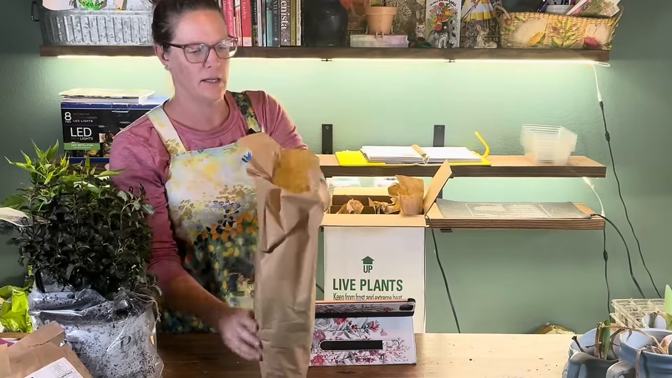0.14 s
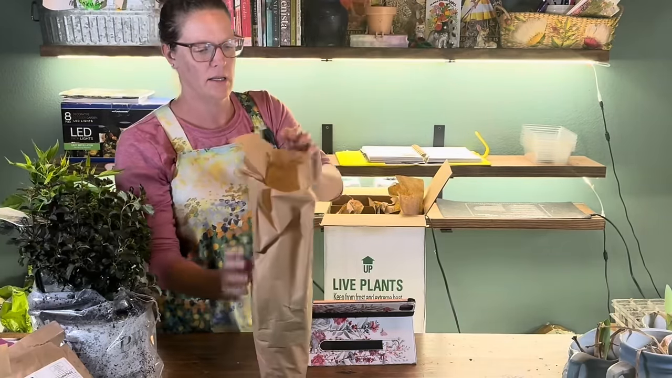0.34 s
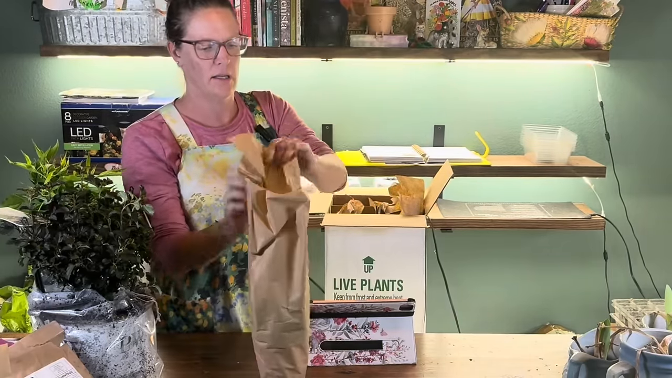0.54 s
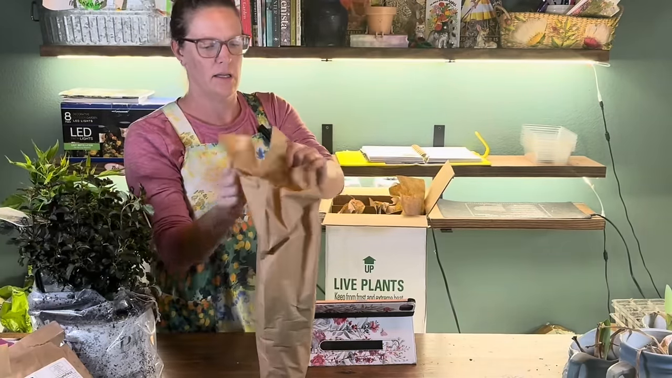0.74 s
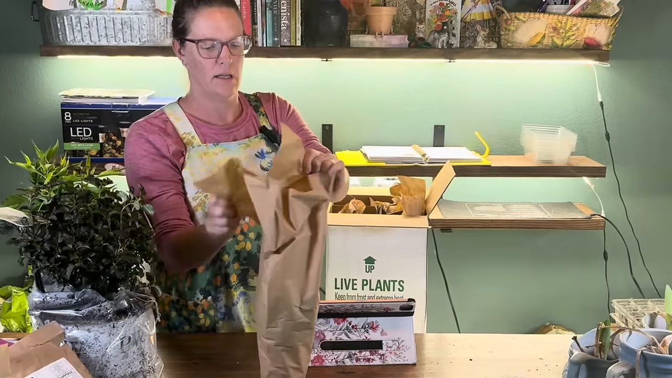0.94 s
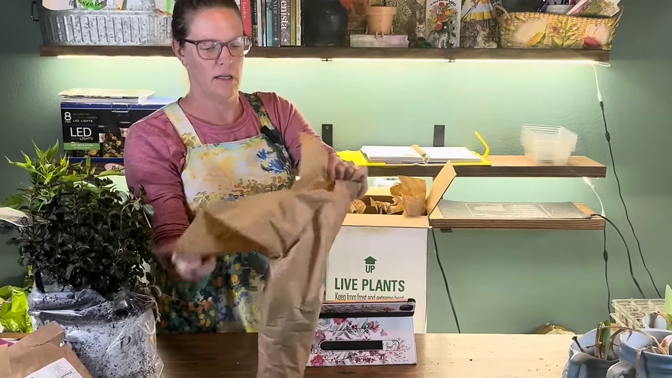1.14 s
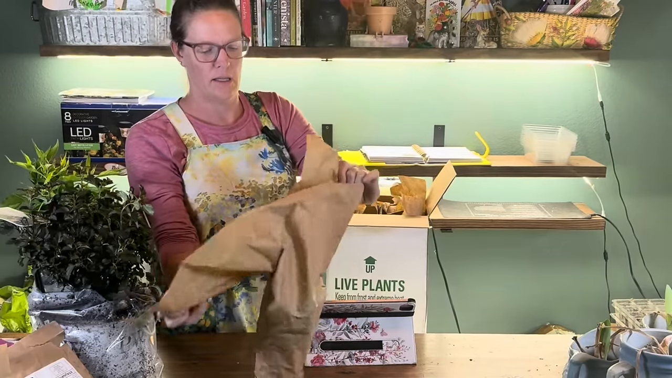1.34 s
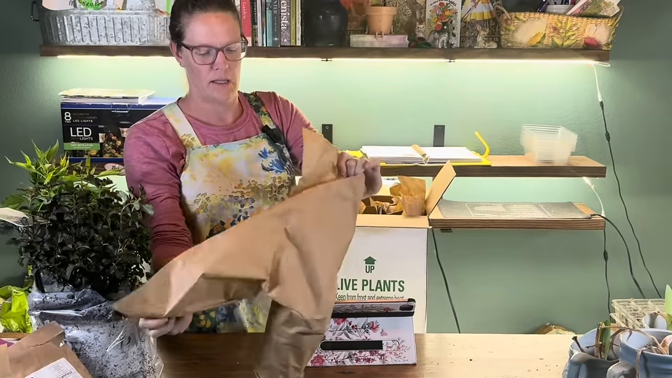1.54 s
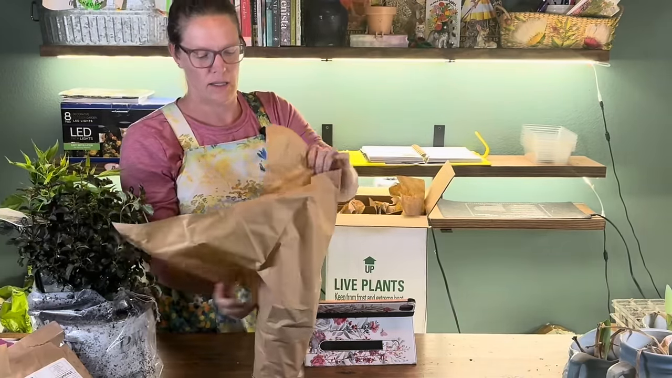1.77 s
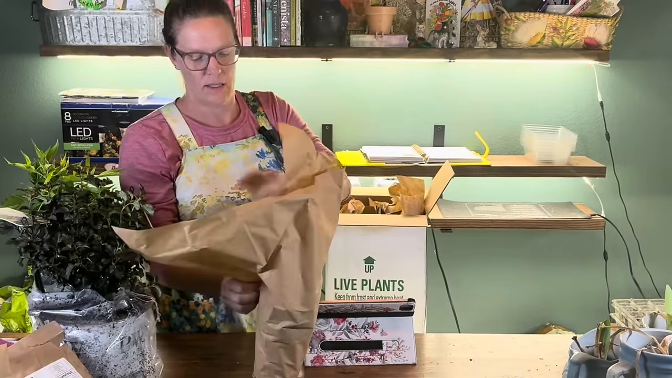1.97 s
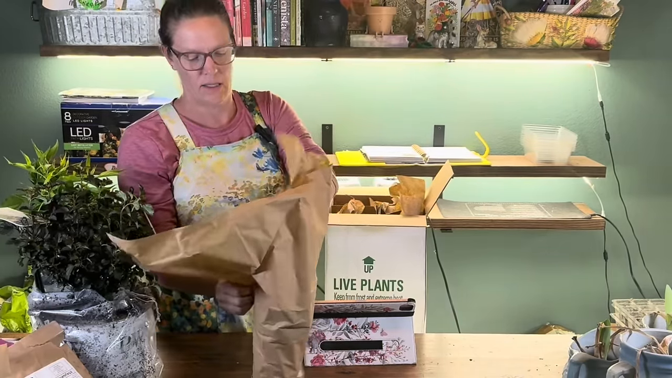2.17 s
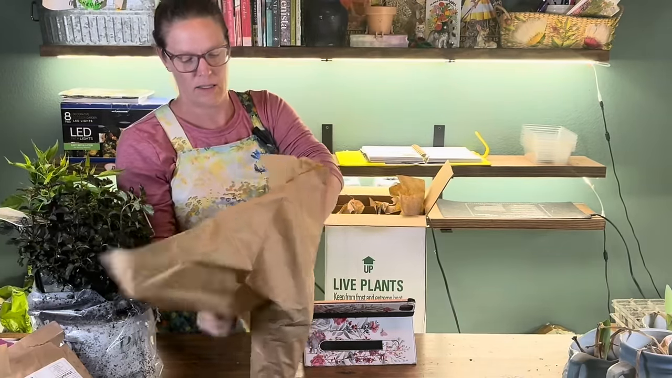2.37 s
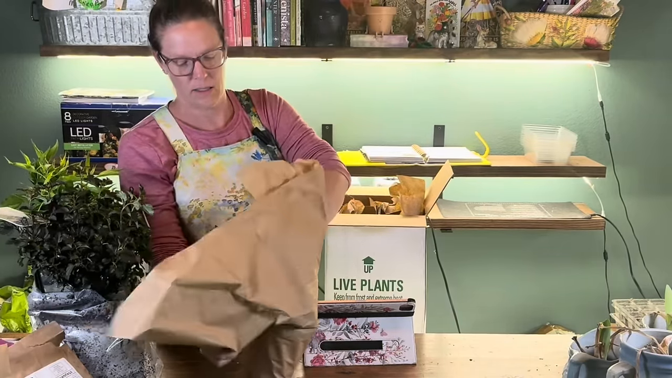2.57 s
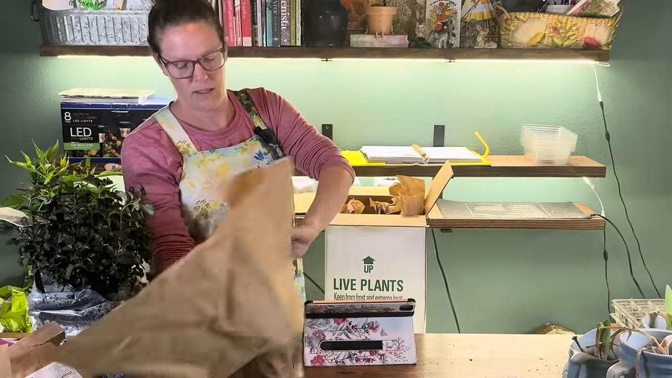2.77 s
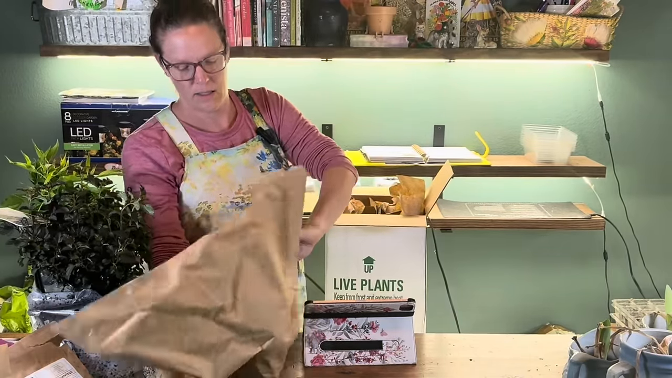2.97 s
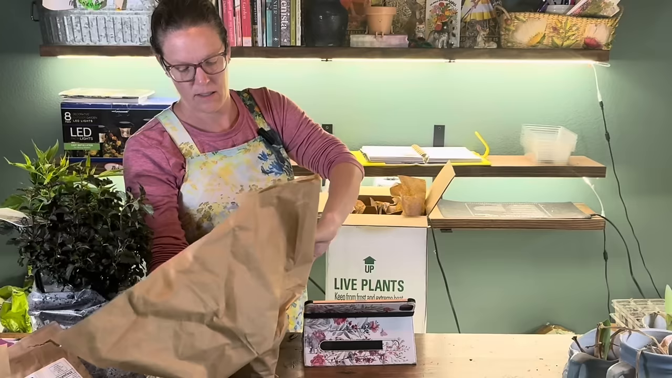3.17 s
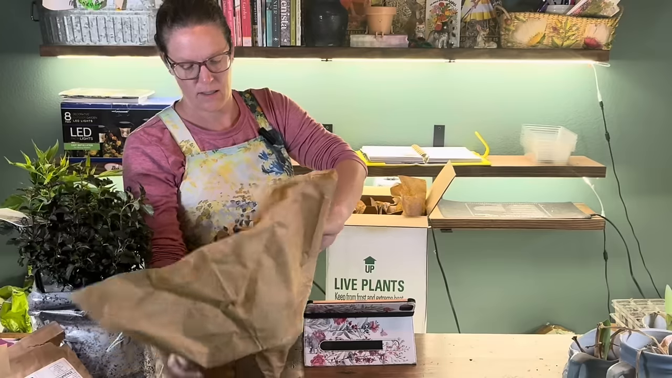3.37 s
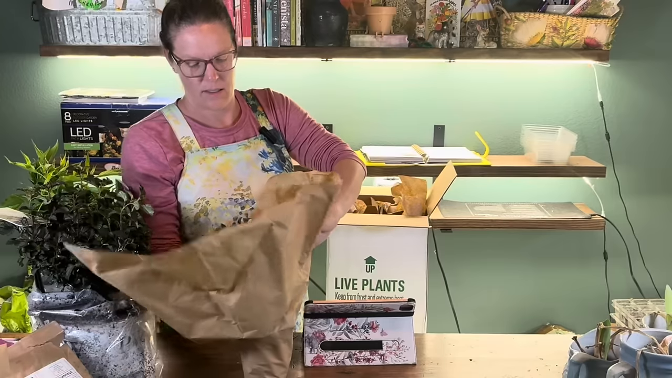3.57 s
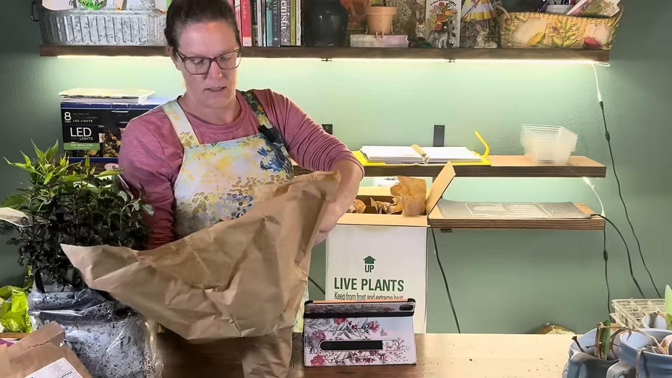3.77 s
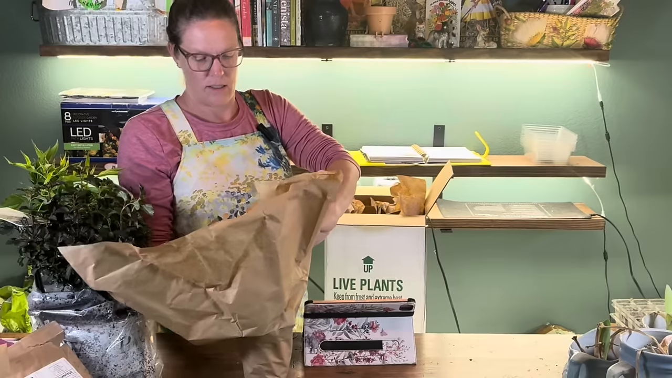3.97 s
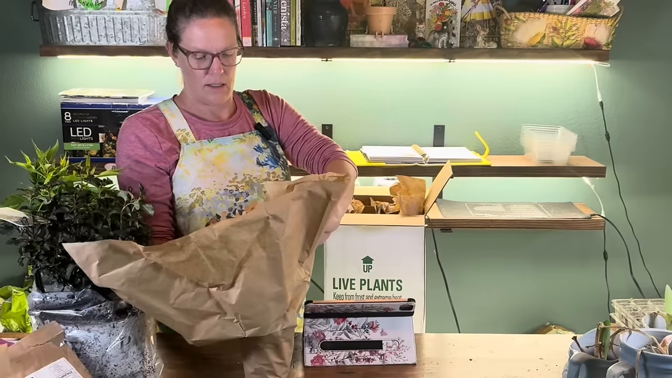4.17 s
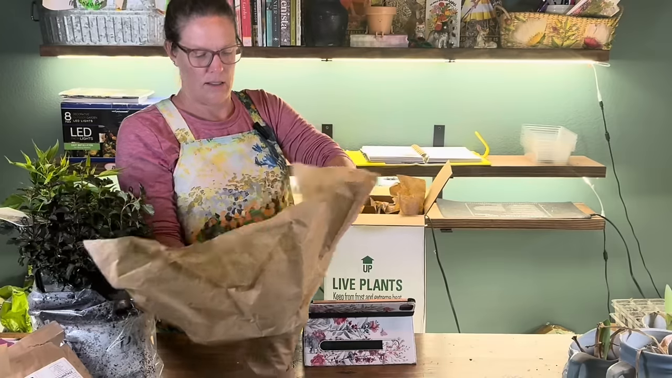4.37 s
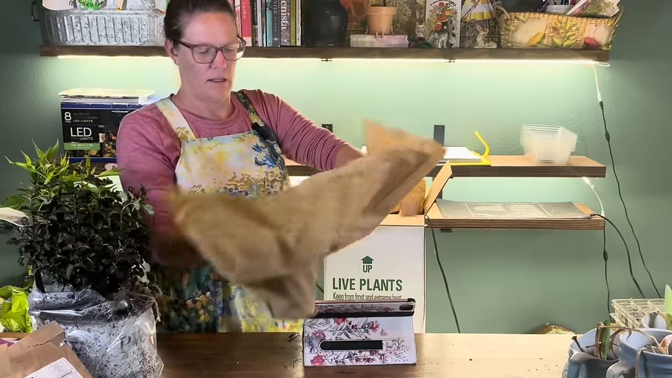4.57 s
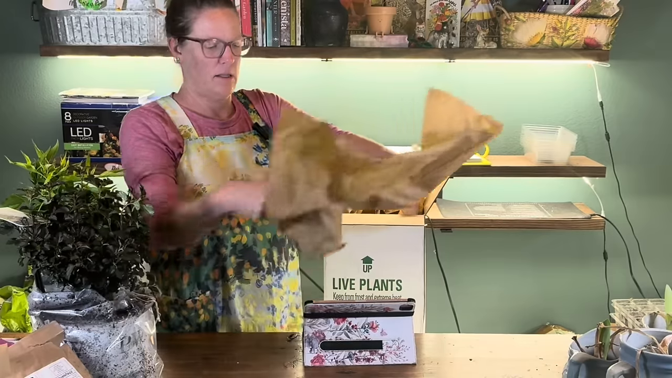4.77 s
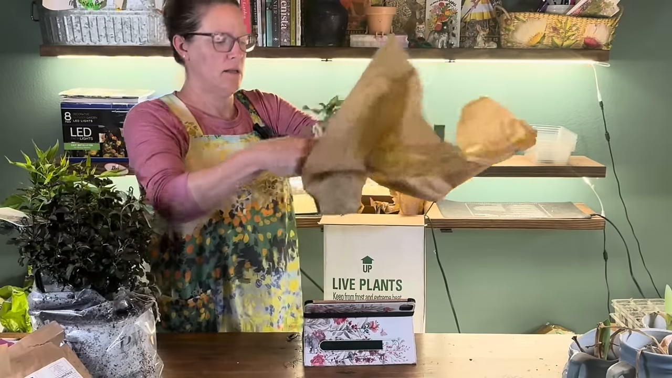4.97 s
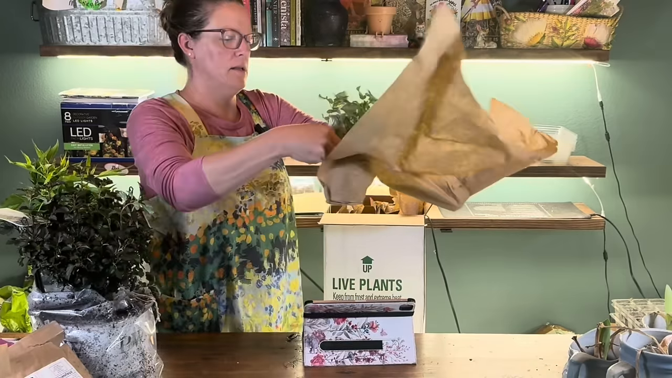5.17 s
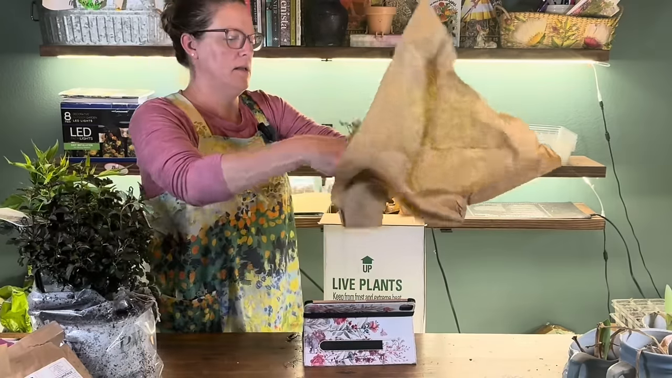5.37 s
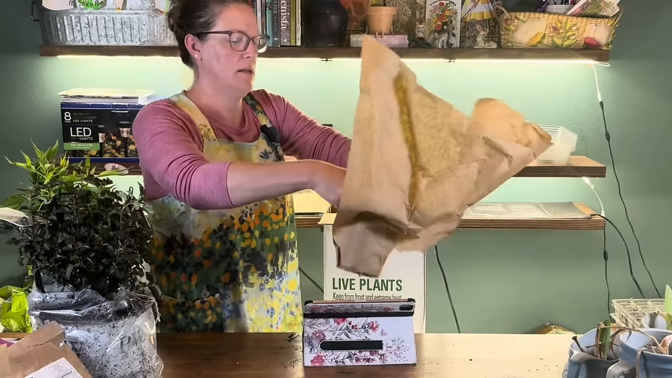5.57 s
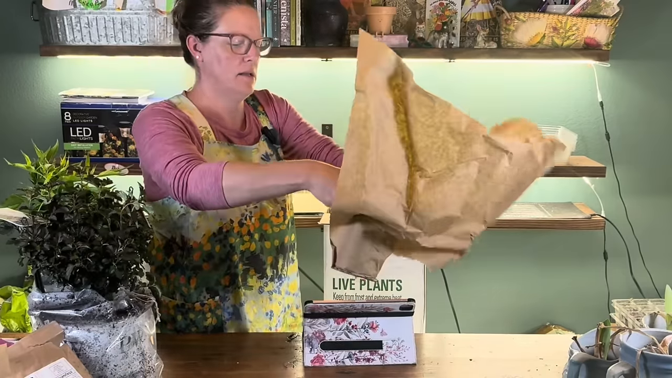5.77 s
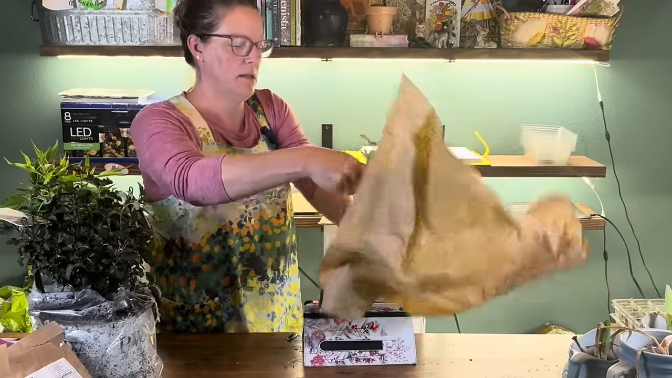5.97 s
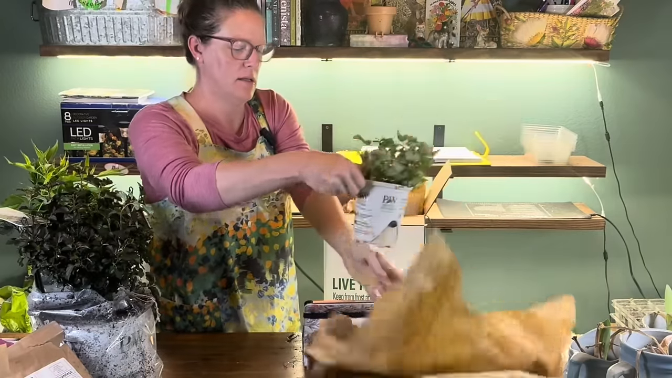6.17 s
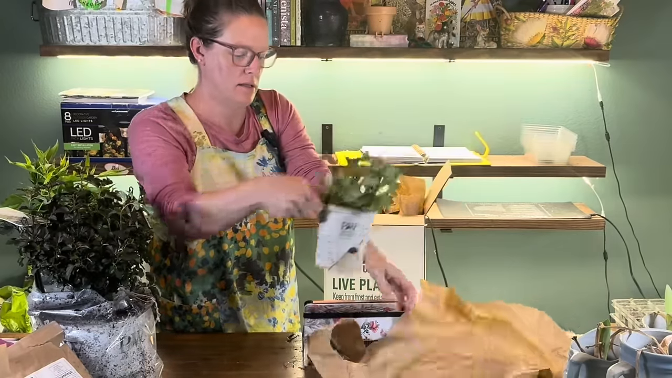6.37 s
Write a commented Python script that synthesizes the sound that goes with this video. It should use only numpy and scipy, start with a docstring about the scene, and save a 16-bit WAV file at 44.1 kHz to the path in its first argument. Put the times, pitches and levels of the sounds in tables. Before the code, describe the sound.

Heavy wrapping paper handled at a bench: quiet creasing first, then hard crumpling with bright hissy crackle and single sharp snaps, peaks distorting. Two shorter bursts follow, separated by near stillness with soft low puffs of air. A last vigorous pull crackles, then gentle rustling tails off. Small, short room echo, faint hum, a bright ringing, close small microphone.

```python
"""Stiff kraft paper is pulled open, crumpled and shaken off a potted plant at a workbench in a small room.
Creases buckle as clumped random clicks of noise, denser under effort, over sliding hiss; big ones snap singly.
The sheet flaps in soft low puffs and faintly rings a note; room tone and a faint hum lie beneath.
A small microphone with a ringing port colours the paper and overloads on peaks."""
import sys
import numpy as np
from scipy import signal
from scipy.fft import rfft, irfft
from scipy.io import wavfile
from scipy.ndimage import uniform_filter1d

SR = 44100
rng = np.random.default_rng(int(sys.argv[2]) if len(sys.argv) > 2 else 0)


def gain_from_db(level_db):
    """Convert decibel levels to linear amplitude factors (20 dB per decade)."""
    decades = np.asarray(level_db, float) / 20
    return 10 ** decades


def store_pcm(level_fs):
    """Save levels as 16-bit WAV."""
    pcm = np.round(np.clip(level_fs, -1, 1) * 32767).astype(np.int16)
    wavfile.write(sys.argv[1], SR, np.atleast_2d(pcm).T)


N = 282681  # length in samples

# sizes of fold, one a row: fine creases, middle folds, wide folds, broad panels, crisp edge:
# (level re effort_db [dB], share of the fullness, gain when lifted [dB],
#  gain per dB of effort above easy [dB], sliding hiss re crackle [factor])
FOLDS = [(-1, -1, -0.5, 0, 1.0), (-2, 0.42, -1, 0.0459, .8), (-8.5, .95, -4, -0.05, 1.6),
         (-10, 0.94, 1, -0.0426, 1.3), (-11, 0.3, 6, 0.1049, 0.41)]


def evened(x):
    """Scales a sound to rms 1."""
    return x / np.sqrt(np.mean(x ** 2) + 1e-20)


def read(points, hz):
    """Reads a spectrum table on a log-frequency axis."""
    f, value = np.transpose(points)
    return np.interp(np.log(hz + 1), np.log(f + 1), value)


def add(mix, start_s, sound):
    """Adds a sound to the mix from start_s on, cut at the end of the mix."""
    part = mix[round(start_s * SR):][:len(sound)]
    part += sound[:len(part)]


def wander(cutoff_hz):
    """Slow random motion of rms 1: noise below cutoff_hz."""
    return evened(signal.lfilter(*signal.butter(2, cutoff_hz, fs=SR), rng.standard_normal(N)))


def air():
    """Room tone is shaped noise with lumpy bass, as from draughts; a wavering sine is the hum."""
    # colour of the room tone: (pitch_hz, relative level_db per Hz)
    air_colour = [(15, -30.5), (25, 13), (118, -2.5), (191, -2.5), (318, 0), (558, -4), (879, -4.5),
                  (1910, -10.5), (4620, -17), (5140, -18.5), (7680, -19.5), (9520, -13.5), (15000, -25.5)]
    # the hum: (pitch_hz, rms level_db)
    hum_tone = [(118.4, -68)]
    lumps_db, lumps_hz = -0.5, 110
    hz = np.fft.rfftfreq(N, 1 / SR)
    spectrum = rfft(rng.standard_normal(N)) * gain_from_db(read(air_colour, hz))
    bass = irfft(spectrum / (1 + (hz / lumps_hz) ** 4), N)
    rest = irfft(spectrum, N) - bass
    lumpy = rest + bass * evened(gain_from_db(lumps_db * wander(17)))
    (hum_hz, hum_db), = hum_tone
    hum = np.sqrt(2) * np.sin(2 * np.pi * hum_hz * np.arange(N) / SR)
    hum *= gain_from_db(hum_db + 0.83 * wander(4))
    return gain_from_db(-61 + 1.5 * wander(6.9)) * evened(lumpy) + hum


def notes():
    """The taut sheet briefly rings a faint note: a sine with a soft onset and exponential decay."""
    # (start_s, level_db before onset and decay)
    taut_notes = [(3.578, -47), (3.62, -46.5), (3.643, -45.5)]
    pitch_hz, t60_s, onset_s = 586, 0.22, 0.0023
    out, t = np.zeros(N), np.arange(SR // 4) / SR
    note = np.sin(2 * np.pi * pitch_hz * t) * (1 - np.exp(-t / onset_s))
    for start_s, level_db in taut_notes:
        add(out, start_s, gain_from_db(level_db - 60 * t / t60_s) * note)
    return out


def puffs():
    """The flapping sheet pushes a soft bump of low air, a windowed cosine of about two gliding cycles."""
    # flaps or bumps: (middle_s, peak level_db, centre pitch_hz)
    flaps = [(0.326, -44.5, 97), (1.573, -53, 70), (1.635, -41.5, 119), (1.712, -43, 85),
             (1.779, -30.5, 97), (1.803, -32.5, 97), (1.853, -46, 126), (1.938, -40.5, 85),
             (1.985, -44, 100), (2.109, -49, 71), (2.179, -42, 107), (3.008, -44, 92), (3.11, -46, 116),
             (3.39, -46, 66), (3.589, -42, 127), (3.644, -39, 140), (4.045, -50.5, 78.7),
             (4.079, -42.5, 124), (5.243, -42, 90), (5.278, -37, 100), (5.344, -40, 109), (5.619, -43, 89),
             (5.647, -39.5, 109), (5.729, -40, 119), (5.85, -50, 67), (5.905, -41.5, 79.5),
             (5.972, -51, 83.8), (6.233, -35, 110), (6.393, -45, 88)]
    cycles, uneven = 1.94, 0.27  # length; largest glide is about this share of the pitch
    out = np.zeros(N)
    for (middle_s, peak_db, hz), (start, sag) in zip(flaps, rng.uniform(-1.07, 1, (len(flaps), 2))):
        size = round(cycles * SR / hz)
        turns = np.cumsum(hz * (1 + uneven * sag * np.linspace(-1, 1, size))) / SR
        bump = np.cos(2 * np.pi * turns + np.pi * start) * np.hanning(size) ** 2
        add(out, middle_s - size / 2 / SR, gain_from_db(peak_db) * bump / abs(bump).max())
    return out


def paper_bands(size=2048):
    """Causal filters of the paper colour, one for each size of fold; their powers share out the whole colour."""
    # paper as the microphone hears it, its port ringing near the top: (pitch_hz, relative level_db per Hz)
    paper_colour = [(59, -51.5), (100, -23), (223, -15), (287, -11.5), (530, -7.5), (615, -3.5), (1340, -3),
                    (2230, -6.5), (3700, 0), (5530, -2.5), (7750, 13), (9980, -2), (11800, -6.5),
                    (14600, -8.5), (15600, -15.5), (15800, -38)]
    # borders [Hz] between broad panels, wide folds, middle folds, fine creases and crisp edge
    splits_hz = [900, 2200, 5500, 9500]
    hz = abs(np.fft.fftfreq(size, 1 / SR))
    below = [1 / (1 + (hz / f) ** 10) for f in splits_hz]
    shares = np.diff([0 * hz, *below, 1 + 0 * hz], axis=0)
    log_gain = np.log(gain_from_db(read(paper_colour, hz)) * np.sqrt(np.maximum(shares, 0)) + 1e-5)
    # minimum phase: the response starts at once
    taps = np.fft.ifft(np.exp(np.conj(signal.hilbert(log_gain)))).real[:, :size // 2]
    return taps[[3, 2, 1, 0, 4]]  # in the order of FOLDS


def snaps(bands):
    """A large crease gives way at once: a noise burst around its own pitch, with a shiver and a ring."""
    # single creases: (start_s, level_db at its pitch before the ring, octaves below the fine crackle,
    # loss per octave away from that pitch [dB])
    creases = [(0.027, -34, 3.5, 12), (0.066, -17.5, 0.5, 16), (0.074, -36, 1.9, 3), (0.096, -33.2, 3.2, 2),
               (0.179, -18.5, 0.5, 16), (0.248, -17, 0.16, 13), (0.257, -14, 0.5, 14.5),
               (0.358, -19, 1.6, 16.5), (0.493, -5, 0.2, 10.5), (0.545, -30, 2.2, 3.0),
               (0.553, -21.5, 0.9, 6.9), (0.575, -19, 0.5, 7), (0.58, -25, 5, -2), (0.621, -8.5, 1.67, 22),
               (0.653, -9, 0.45, 10), (0.69, -18, 0.45, 7), (0.709, -15.5, 2.15, 12.5),
               (0.728, -8.5, 1.23, 9), (0.748, -15.6, 1, 20), (0.754, -21, 2.4, 18), (0.775, -4, 2.24, 10),
               (0.797, -7, 2, 17), (0.887, -11, 0.15, 6.5), (1.039, -9, -4, 0), (1.119, -4.5, -0.5, 1.5),
               (1.335, -6, 0.6, 6.5), (1.35, -13, -1, 16), (1.383, 7.5, 1.5, 10), (1.574, -34, 0.67, 9.2),
               (1.623, -23.5, 1.16, 14), (1.645, -27.7, 0.1, 9), (1.724, -26, 0.29, 0),
               (1.786, -23, 5.2, 4.5), (1.903, -31, 4.5, 7), (1.98, -44.0, 4.4, 3.5), (2.151, -40, 6, 1),
               (2.178, -16, 0.6, 5.5), (2.226, -25.5, 1.9, 11), (2.27, -16.5, 0.3, 7),
               (2.302, -21, -0.4, 9.1), (2.392, -4.5, -0.5, 2.5), (2.42, -12, -3, 7),
               (2.539, -15.6, -0.5, 8.8), (2.675, -18, -8, 6.7), (2.69, -16, -1, 14), (2.71, -1, 1, 9),
               (2.726, -3.5, 1.77, 13), (3.021, -42, 7, 18), (3.122, -26, -0.5, -2), (3.138, -20, 1, 2),
               (3.169, 1, -0.5, 19), (3.191, -7.5, -8, 6), (3.218, -27, 10, 17), (3.283, -12.5, 0.5, 11),
               (3.324, -32, 1.7, 7), (3.358, -39, 0, 12), (3.562, -28.5, 5.3, 3), (3.628, -36, 0.5, 7),
               (3.674, -39, 5, 3), (3.76, -43.0, 1.5, 6.5), (3.936, -45, 0.0, 8.5), (4.017, -46, 2.6, 9.0),
               (4.187, -44, 3.7, 1), (4.355, -36, 0.5, 7.5), (4.431, -23.5, 2.1, 17),
               (4.482, -15.5, 0.0, 5), (4.522, -4, 0.5, 12), (4.74, -17.5, 4.5, 3), (4.758, -5, -0.5, 6.5),
               (4.782, 6, -1.5, 5.5), (4.849, -8, 1.6, 8), (4.961, -23.4, 0.3, 5), (4.973, -14, 1, 6),
               (4.988, -19, 1.4, 13), (5.079, -23, 3, 10), (5.139, 6.5, 0.4, 19), (5.333, -20, 0.3, 3),
               (5.418, -33, 3.5, 4.3), (5.432, -21.0, 1.2, 7.7), (5.448, -20, 1.3, 6),
               (5.513, -33.5, 1, -2), (5.593, -23.5, 2.5, 18), (5.734, -33, -0.5, 2.5),
               (5.759, -34.5, 0.7, 3), (5.776, -22.5, 1.4, 4), (5.898, -38.5, -1, 2), (6.071, -37, 2.52, 1),
               (6.154, -37.5, 2.8, 7.5), (6.177, -34.5, 2.5, 2), (6.183, -33, 5, 4),
               (6.219, -20, 1.16, 8.5), (6.26, -25.5, -6, 7)]
    # pitch of each size of fold [octaves below the fine crackle]
    fold_octaves = np.array([0, 1.02, 2.42, 3.64, -.68])
    fine_hz, edge_db = 7500, -8
    rise_ms, short_ms, ms_per_octave = 0.096, 1.5, 0.1  # deeper snaps fade more slowly
    shiver_db, shiver_ms = -14, 2.7
    ring, sharp = 0.28, 3.5  # share of the resonance in the mix; its Q
    out, ms = np.zeros(N), np.arange(600) / SR * 1000
    noises = rng.standard_normal((len(creases), 5, 600))
    for (start_s, peak_db, octaves, narrow_db), noise in zip(creases, noises):
        fade = np.exp(-ms / max(short_ms + ms_per_octave * octaves, .1))
        shiver = gain_from_db(shiver_db) * np.exp(-ms / shiver_ms)
        bursts = noise * (fade + shiver) * (1 - np.exp(-ms / rise_ms))
        parts = [np.convolve(burst, taps) for burst, taps in zip(bursts, bands)]
        fold_db = peak_db - max(narrow_db, 0) * abs(fold_octaves - octaves) + [0, 0, 0, 0, edge_db]
        snap = sum(gain_from_db(db) * part / abs(part).max() for part, db in zip(parts, fold_db))
        ring_hz = np.clip(fine_hz / 2 ** octaves, 300, 12000)
        rung = signal.lfilter(*signal.iirpeak(ring_hz, sharp, fs=SR), snap)
        add(out, start_s, (1 - ring) * snap + ring * rung * abs(snap).max() / abs(rung).max())
    return out


def handling():
    """Level of each size of fold over time: strokes of the hands add up in power."""
    # each pull, squeeze or shift of the hands: (crest_s, rise_s, fall_s,
    # effort_db before the FOLDS offsets, fullness_db: how much large folds join in)
    strokes = [(0.102, 0.18, 0.24, -45.5, 0.3), (0.238, 0.09, 0.096, -44, 1),
               (0.352, 0.065, 0.35, -44, -0.5), (0.499, 0.013, 0.18, -44.5, -4),
               (0.588, 0.027, 0.1, -33.5, 7.5), (0.665, 0.019, 0.052, -36.5, 3.5),
               (0.742, 0.055, 0.026, -43, 14), (0.793, 0.045, 0.16, -20.5, 2),
               (0.896, 0.03, 0.54, -24.5, 3.7), (1.04, 0.053, 0.05, -24, 0.5),
               (1.124, 0.33, 0.057, -13, -0.4), (1.221, 0.11, 0.07, -13.5, -1.5),
               (1.274, 0.09, 0.035, -13.1, -2.5), (1.357, 0.023, 0.144, -17.5, -4),
               (1.454, 0.11, 0.046, -13, 3), (1.651, 0.224, 0.24, -48, 4.5), (1.835, 0.24, 0.17, -40, 0.5),
               (2.193, 0.05, 0.117, -50.5, 9.5), (2.2, 0.288, 0.129, -59.5, -2.5),
               (2.416, 0.13, 0.16, -19, -0.3), (2.506, 0.073, 0.049, -26, -2),
               (2.636, 0.127, 0.029, -38, -3), (2.739, 0.087, 0.087, -18.5, -2.5),
               (2.803, 0.119, 0.12, -17.5, -0.7), (3.09, 0.18, 0.59, -51, 4),
               (3.141, 0.014, 0.055, -24.5, -5), (3.171, 0.0099, 0.015, -16, -7),
               (3.197, 0.02, 0.05, -20.5, -5.5), (3.23, 0.069, 0.062, -25, -1.5),
               (3.457, 0.484, 0.2, -51.5, -1), (3.638, 0.16, 0.12, -46, 1), (3.744, 0.02, 0.14, -60, -3.5),
               (3.93, 0.08, 0.095, -60.5, -1), (4.024, 0.031, 0.2, -59.5, -1.5),
               (4.262, 0.12, 0.047, -58.5, -3.5), (4.436, 0.41, 0.56, -54.5, 2),
               (4.488, 0.01, 0.25, -36.5, -8), (4.588, 0.098, 0.17, -24, 2.5),
               (4.776, 0.042, 0.058, -23, 4.5), (4.845, 0.099, 0.1, -24.5, 5.5),
               (4.99, 0.037, 0.15, -25.5, 1), (5.085, 0.048, 0.11, -23, 4.5),
               (5.144, 0.034, 0.077, -18, 5.5), (5.421, 0.32, 0.12, -36.5, 1),
               (5.524, 0.035, 0.083, -45, 0), (5.609, 0.042, 0.081, -54.5, 6),
               (5.776, 0.013, 0.027, -40.5, 3.5), (5.783, 0.098, 0.21, -47, -0.5),
               (5.86, 0.05, 0.1, -50.0, 7), (5.926, 0.038, 0.051, -44.5, 0.5),
               (6.073, 0.013, 0.234, -61.5, 8), (6.182, 0.014, 0.21, -43, 1.5),
               (6.222, 0.0084, 0.07, -37.5, 6), (6.273, 0.04, 0.053, -45.5, 12.5),
               (6.357, 0.034, 0.485, -56.5, 2)]
    # how far the sheet is lifted off the bench and turned to the microphone: (time_s, lift 0-1)
    lift_path = [(0, 1), (.7, 0), (1.5, 0), (2.0, 0), (3.0, .3), (3.5, 0.3), (4.2, 0.4), (4.5, 0.6),
                 (4.8, 0.7), (5.3, 0.92), (5.7, 0.83), (6.0, 0.95), (6.4, 0.63)]
    easy_db, edge_db = -28.5, -20.5  # easy effort; level one rise before or one fall after the crest
    rise_power, fall_power = 1.73, 1.475
    crest, rise, fall, effort_db, full_db = np.transpose(strokes)[..., None]
    t = np.arange(0, N / SR + .002, .002)
    before, after = abs(crest - t) / rise, abs(t - crest) / fall
    away = np.where(t < crest, before ** rise_power, after ** fall_power)
    stroke_db = np.maximum(effort_db + edge_db * away, -120)
    lift = np.interp(t, *np.transpose(lift_path))
    levels = []
    for offset_db, share, lifted_db, per_effort, _ in FOLDS:
        fold_db = stroke_db + offset_db + share * full_db + lifted_db * lift
        fold_db += per_effort * (stroke_db - easy_db)
        level = np.sqrt((gain_from_db(fold_db) ** 2).sum(0))
        levels.append(np.interp(np.arange(N) / SR, t, level))
    return levels


def buckling(busy):
    """Energy of countless small creases: random clicks, more frequent and more alike when busy."""
    calm_per_s, busy_per_s = 900, 4000
    spread_db, clump_db, evening = 2.5, 3.0, 0.47
    per_s = calm_per_s * (busy_per_s / calm_per_s) ** busy
    size_db = spread_db * np.minimum(rng.exponential(1, N), 2.3) + clump_db * wander(57)
    size = gain_from_db((1 - evening * busy) * size_db)
    return (rng.random(N) < per_s / SR) * size / np.sqrt(per_s)


def shifting(sound):
    """The sheet's resonances shift as it changes shape, and the bounce off the bench colours one band."""
    # the band dips or swells, moving as the paper is lifted: (time_s, pitch_hz, gain_db)
    hollow = [(0, 2170, 1.5), (.8, 2360, -11), (1.3, 2110, -6), (1.501, 2060, 5), (2.3, 1900, -3),
              (3.299, 1680, -3), (4.5, 1350, -8.5), (5.2, 1620, 4), (6.4, 1700, 2.5)]
    shift_db = 1.0
    hz, t, z = signal.stft(sound, SR, nperseg=256, noverlap=192)
    # patches some 700 Hz wide, lasting some 30 ms
    patches = uniform_filter1d(rng.standard_normal(z.shape), size=4, axis=0)
    patches = evened(uniform_filter1d(patches, size=20, axis=1))
    s, hollow_hz, gain_db = np.transpose(hollow)
    away = (hz[:, None] / np.interp(t, s, hollow_hz) - 1) / 0.17
    hollow_db = np.interp(t, s, gain_db) * np.exp(-away ** 2)
    return signal.istft(z * gain_from_db(shift_db * patches + hollow_db), nperseg=256, noverlap=192)[1][:N]


def crackle(bands):
    """Small creases buckle as fading noise clicks over the hiss of paper sliding on paper, fold by fold."""
    colour_db, drift_db = 8.0, 2.0
    levels = handling()
    busy = np.clip((20 * np.log10(levels[0]) + 57.5) / 30, 0, 1)
    clicks = buckling(busy)
    kind, out = rng.integers(0, 4, N), np.zeros(N)
    # a crease tears loose in a fraction of a millisecond up to a few
    fades = np.exp(-2 / (SR * np.geomspace(.0003, .003, 4)))
    for taps, level, (*_, rub) in zip(bands, levels, FOLDS):
        favour = gain_from_db(colour_db * np.clip(rng.standard_normal(N), -2, 2))  # each crease favours some folds
        energy = (clicks * favour) ** 2
        power = sum(signal.lfilter([1 - r], [1, -r], energy * (kind == k)) for k, r in enumerate(fades))
        drive = np.sqrt(power / power.mean() + rub ** 2) * rng.standard_normal(N)
        band = evened(signal.oaconvolve(drive, taps)[:N])
        out += level * gain_from_db(drift_db * wander(8.5)) * band
    return shifting(out)


def reflections():
    """Direct sound, a few early echoes, then sparse taps of random sign, each band dying at its own speed."""
    # bench, shelves, wall: (delay_ms before a random stretch, level_db re direct sound)
    echoes = [(2.5, -11), (4.1, -9.5), (7.5, -24), (11, -19), (16, -37.5)]
    # decay of the room: (pitch_hz, t60_s)
    decay = [(200, 0.19), (1000, 0.23), (4000, 0.21), (8000, 0.13), (15000, 0.33)]
    tail_db = -9  # whole tail re direct sound
    taps = np.zeros(SR // 2)
    at = np.arange(300, len(taps) - 20, 20)
    taps[at + rng.integers(0, 20, len(at))] = rng.choice([-1., 1.], len(at))
    hz, t, z = signal.stft(taps, SR, nperseg=128)
    tail = signal.istft(z * gain_from_db(-60 * t / read(decay, hz)[:, None]), SR, nperseg=128)[1]
    tail *= gain_from_db(tail_db) / np.linalg.norm(tail)
    tail[0] = 1
    for ms, db in echoes:
        tail[round(ms * rng.uniform(.75, 1.25) * SR / 1000)] += gain_from_db(db)
    return tail / np.linalg.norm(tail)


def room(x, count=6, moves_per_s=18):
    """The moving paper's sound crossfades in turn through the reflections of several places."""
    place = np.arange(N) / SR * moves_per_s
    out = np.zeros(N)
    for k in range(count):
        away = abs((place - k + count / 2) % count - count / 2)
        here = x * np.cos(np.pi / 2 * np.minimum(away, 1))
        out += signal.oaconvolve(here, reflections())[:N]
    return out


def scene():
    """Crackle, snaps and notes of the paper in the room, with puffs and room tone added dry."""
    bands = paper_bands()
    paper = crackle(bands) + snaps(bands) + notes()
    return (room(paper) + puffs() + air())[None]


def band_limit(x):
    """A steep low-pass at the top of the band."""
    return signal.sosfilt(signal.butter(12, 15700, fs=SR, output="sos"), x)


def record(dry):
    """The microphone overloads: peaks beyond full scale are clipped flat."""
    clipped = np.clip(dry, -1, 1)
    return band_limit(clipped)


dry = scene()
out = record(dry)
store_pcm(out)
```